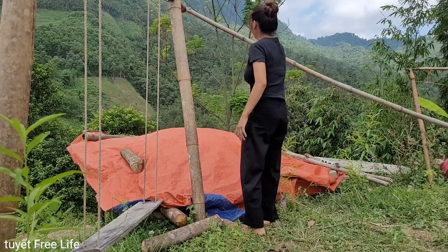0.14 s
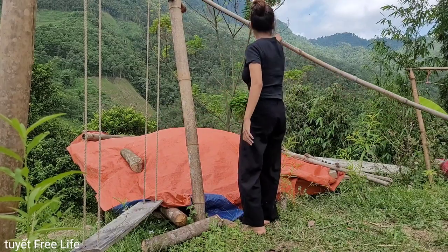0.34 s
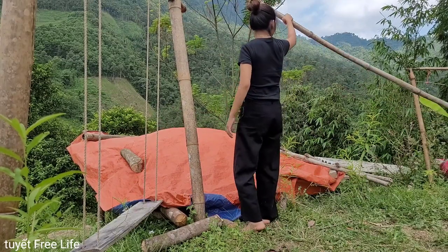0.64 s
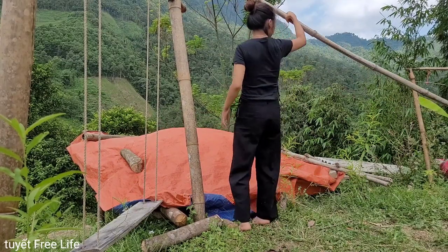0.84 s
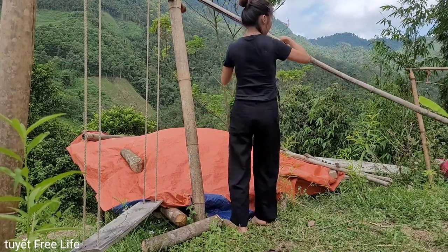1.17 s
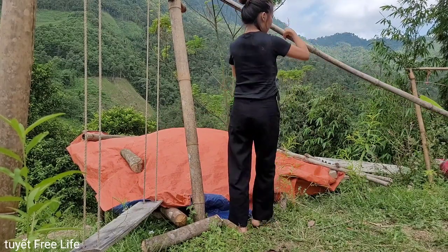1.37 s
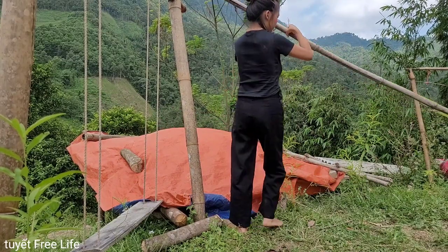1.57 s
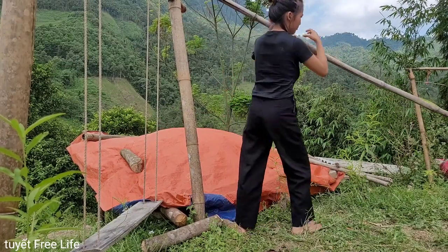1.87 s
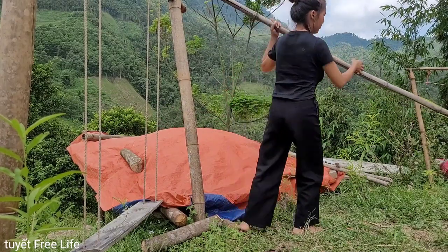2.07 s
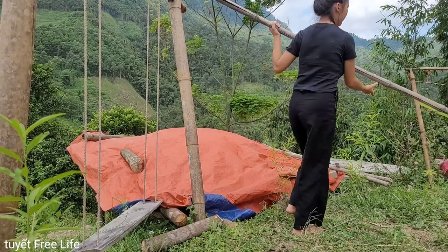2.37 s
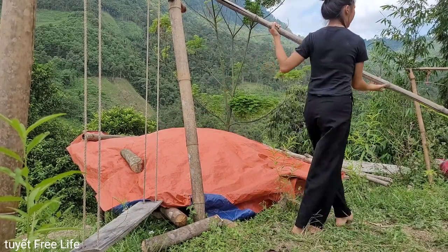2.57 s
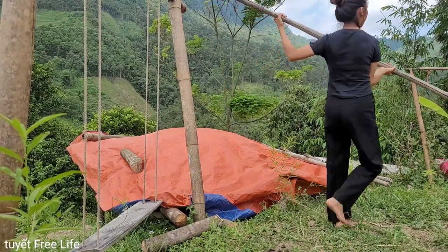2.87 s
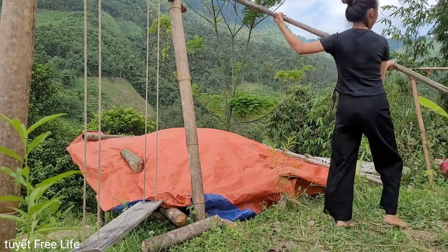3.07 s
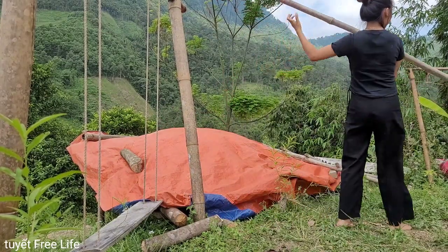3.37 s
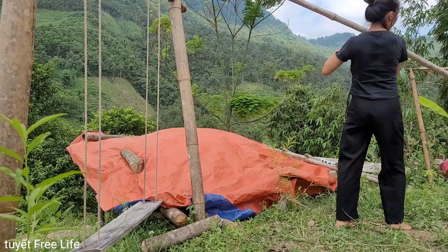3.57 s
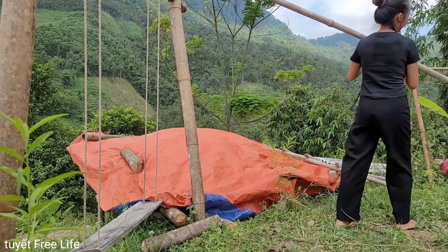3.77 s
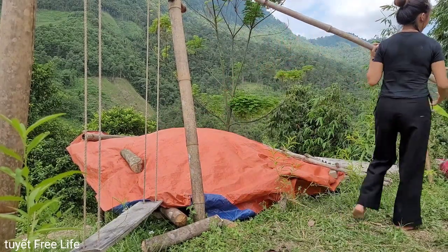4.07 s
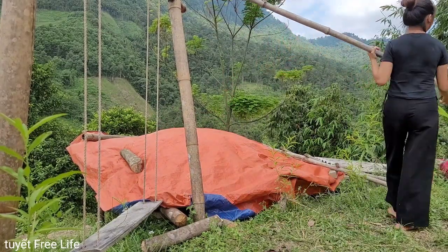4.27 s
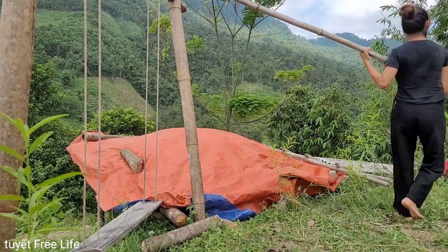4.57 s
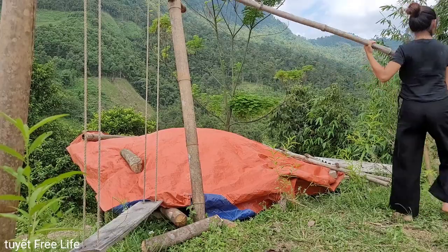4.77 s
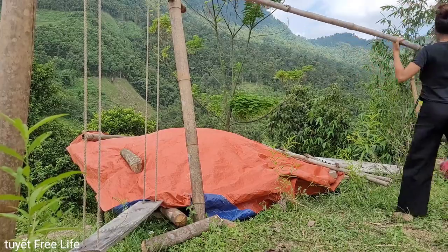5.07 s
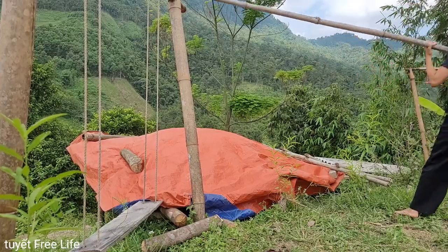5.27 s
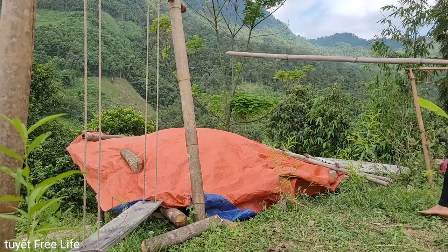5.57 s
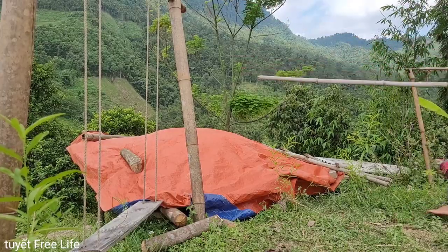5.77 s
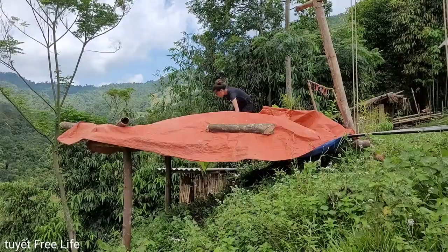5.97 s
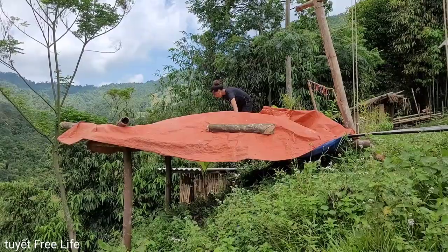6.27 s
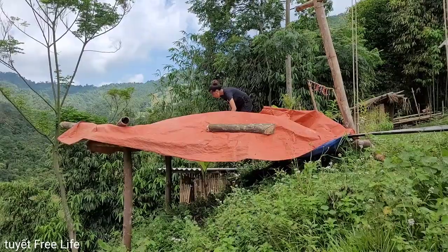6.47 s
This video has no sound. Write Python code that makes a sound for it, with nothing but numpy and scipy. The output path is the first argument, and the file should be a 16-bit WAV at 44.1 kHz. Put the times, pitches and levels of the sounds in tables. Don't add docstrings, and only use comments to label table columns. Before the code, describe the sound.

A long bamboo pole clatters and knocks on a wooden frame over a buzzing cicada, faint engine and wind thumps, before a louder insect chorus takes over.

```python
import sys
import numpy as np
from scipy import signal
from scipy.fft import rfft, irfft
from scipy.io import wavfile
from scipy.ndimage import uniform_filter1d

SR = 44100
rng = np.random.default_rng(int(sys.argv[2]) if len(sys.argv) > 2 else 0)


def to_linear_factor(level_db):
    exponent = np.asarray(level_db, float) / 20
    return 10 ** exponent


def master(y):
    cut = np.clip(np.atleast_2d(y).T, -1, 1)
    pcm = np.round(cut * 32767)
    wavfile.write(sys.argv[1], SR, pcm.astype(np.int16))


N = 292824

# [t/s, level/dB]
CHORUS_LEVEL = [(0, -47.5), (1.15, -47), (4.4, -44.5), (5.0, -38), (5.94, -46), (6.02, -38), (6.64, -36.5)]
# [f/Hz, level/dB per Hz]
FIRST_CHORUS = [(88, -44), (150, -18), (230, -5), (430, -17), (850, -15), (1300, -9), (2080, -24),
                (2520, -10), (3250, -21), (4300, -6), (7300, -3), (8800, -30), (12300, -18), (15400, -23)]
SECOND_CHORUS = [(250, -9), (500, -17), (2080, -24), (2430, -6), (3300, -27), (3850, -10), (4500, -16),
                 (5050, -11), (5450, -20), (5850, 0), (6500, -7), (7250, -2), (8800, -25), (13500, -21)]
# [f/Hz, width/Hz, level/dB]
WHISTLES = [(2540, 44, -7), (2760, 31, -9), (3810, 52, -8), (4030, 33, -8), (4250, 33, -11), (5060, 44, -6),
            (5880, 72, 0), (6300, 59, -4), (6560, 31, -2), (6790, 20, -3), (6940, 63, -3), (7190, 85, 0),
            (7420, 30, -4), (7630, 29, -8)]
# [f/Hz, level/dB]
EXHAUST = [(30, -24), (60, 3.5), (110, 1.5), (140, -1.5), (175, -21), (250, -2), (330, -10.5), (500, -49)]
# [t/s, f/Hz]
REVS = [(0, 21), (.8, 20), (2, 19.5), (3, 19), (3.7, 20), (4.05, 22), (4.45, 28), (4.8, 27), (5, 24),
        (5.3, 25.5), (5.6, 23), (6, 25)]
# [f/Hz, level/dB per Hz]
GUST_COLOUR = [(10, -49), (25, -26), (42, -8), (60, 5), (78, -1), (115, -18), (250, -36), (700, -56)]
# [peak t/s, length/s, peak level/dB, left
# minus right/dB]
GUSTS = [(0.462, 0.05, -51, -27), (1.12, 0.071, -54, 11), (1.253, 0.1, -42.5, -1), (1.59, 0.11, -58.5, 19),
         (2.48, 0.066, -48, 1), (3.349, 0.055, -44.5, -26), (3.534, 0.052, -37.5, -44),
         (3.628, 0.18, -41.5, -16), (3.885, 0.29, -48.5, -3), (3.956, 0.084, -38, -34),
         (4.068, 0.045, -24, -36), (4.142, 0.047, -36.5, -21), (4.517, 0.072, -43, 15.5),
         (4.856, 0.067, -41, 20), (5.513, 0.048, -29, 22.5), (5.653, 0.34, -49.5, 8.5),
         (5.75, 0.058, -41, 18.5), (6.003, 0.1, -49.5, -8), (6.087, 0.066, -30.5, -19),
         (6.157, 0.039, -24.5, -43), (6.263, 0.079, -26.5, -36), (6.52, 0.087, -48, 13.5)]
# [f/Hz, t60/s]
SLOPE_DECAY = [(60, 0.46), (170, 0.18), (340, 0.028), (900, 0.12), (1700, 0.092), (3000, 0.1285),
               (6000, 0.044)]
# [t/s, length/s, level/dB, centre f/Hz, width/octaves]
SCUFFS = [(1.822, 0.14, -61.5, 1376, 1.5), (2.678, 0.27, -54.5, 1110, 4.5), (2.741, 0.23, -64, 353, 1.3),
          (2.908, 0.043, -54, 2460, 1.8), (3.087, 0.065, -55, 1500, 1.6), (3.268, 0.15, -54.5, 1200, 1.84),
          (3.817, 0.019, -47, 1820, 2.9), (4.646, 0.1, -52, 1360, 2.1), (5.099, 0.76, -64, 500, 13),
          (5.853, 0.23, -57, 896, 1.8), (5.99, 0.038, -45.5, 920, 1.6), (5.5, 0.4, -67.5, 323, 1),
          (6.05, 0.34, -57, 293, 1.5), (6.377, 0.21, -59, 402, 3), (6.509, 0.022, -48.5, 280, 1.6)]
# [t/s, length/s, level/dB, f/Hz]
TAPS = [(0.27, 0.036, -57.5, 1290), (1.566, 0.036, -62, 243), (2.798, 0.03, -53, 890),
        (3.172, 0.076, -51.5, 452), (3.193, 0.05, -54, 232), (3.807, 0.06, -58, 870),
        (4.135, 0.11, -64, 216), (5.317, 0.12, -54.5, 230), (6.417, 0.036, -45.5, 258),
        (6.454, 0.047, -51, 265), (6.549, 0.033, -66, 282)]
# [t/s, length/s, level/dB]
LEAVES = [
    (1.847, 0.087, -55.5),
    (3.183, 0.033, -56.5),
    (4.853, 0.16, -51),
    (5.168, 0.083, -48.5),
    (5.473, 0.11, -51.5),
]
# [t/s, peak level/dB, centre f/Hz]
SNAPS = [
    (1.61, -44, 11000),
    (2.6575, -23, 7600),
    (2.6775, -24, 6800),
    (2.7187, -33, 4800),
    (4.01, -42, 10500),
]
# [t/s, level/dB, lift of the low drum tone/dB]
CICADA_LEVEL = [(0.0, -51.5, 6), (1.04, -48, 9.5), (1.6, -49, 7), (2.1, -49.5, 4.5), (3.22, -45.5, 5.5),
                (4.33, -43.5, 5.5), (4.75, -43, 8.5), (4.95, -38.5, 5.5), (5.55, -41.5, 4.5),
                (5.92, -48, 5.5), (6.04, -46, 0), (6.64, -66.5, 19)]
# [t/s, f/Hz]
PULSE_RATE = [(0, 257), (.4, 255.8), (1.15, 255.9), (2, 257.1), (2.9, 257.5), (4.2, 256.9), (4.8, 256.1),
              (5.6, 255), (6, 253.8), (6.64, 254.5)]
# [multiple of the rate, level/dB]
OVERTONES = [(4, -24), (5, -4.5), (6, -19.5), (7, -29.5), (8, -35), (9, -13), (10, -7), (11, -13.5),
             (12, -14.5), (13, -18.5), (14, -11.5), (15, -11), (16, -6.5), (17, -7.5), (18, -8.5),
             (19, -10.5), (20, -4.5), (21, -3), (22, -5.5), (23, -5), (24, -6), (25, -3), (26, -3.5),
             (27, -1.5), (28, 0), (29, -6.5), (30, -5.5), (31, -21.5), (32, -11.5), (33, -18)]
# [f/Hz, level/dB]
TREBLE = [(8700, -26), (9500, -21.5), (10300, -24), (11100, -15), (12300, -13.5), (13600, -15),
          (15000, -18)]
# [f/Hz, level/dB]
POLE_MODES = [
    [(393, -4.5), (452, -1.5), (515, -11), (668, -21), (812, -16.5), (1098, -32.5), (1308, -12.5),
     (1577, -12.5), (1701, -4), (1863, -8.5), (3050, -40)],
    [(361, -10), (431, -11), (500, -3), (690, -20.5), (791, -11), (1023, -8), (1300, -1), (1550, -12),
     (1750, -17), (2320, -19)],
    [(300, -9), (390, -0.5), (460, -7.5), (528, -20), (680, -18), (807, -15), (894, -35), (1120, -0.5),
     (1260, -1), (1572, -1), (1712, -9.5), (1900, -13.5)],
    [(290, -7.5), (358, -15), (434, 7.5), (689, -12), (818, -13), (1082, -12), (1308, 7), (1599, -20),
     (1707, -3.5), (1954, -45)],
    [(279, -0.5), (357, -9), (428, 5), (668, -15), (797, -11), (1281, 4), (1556, -21), (2003, -46)],
]
# [f/Hz, level/dB]
FRAME_MODES = [(110, -21.5), (170, -23.5), (250, -23.5)]
# [f/Hz, t60/s]
WOOD_DECAY = [(110, .06), (280, .06), (400, 0.097), (600, 0.0462), (1200, 0.039), (1700, 0.085),
              (3000, 0.016)]
# [t/s, peak level/dB, hardness/dB]
KNOCKS = [
    [(1.2005, -25, 2), (1.2022, -12, 4), (1.2095, -5, -18), (1.2255, -11, -13), (1.243, -12, -5),
     (1.258, -24, 3), (1.2665, -13, -9), (1.278, -18, -16), (1.297, -26, -8), (1.305, -25, -14),
     (1.319, -30, -12), (1.342, -31, -8)],
    [(2.435, -19, -4), (2.446, -22, -12), (2.459, -32, -10), (2.481, -37, -15)],
    [(4.4575, -21, 3), (4.4595, -10, 3), (4.463, -4, -5), (4.468, -8, -5), (4.4755, -11, 1),
     (4.480, -8, -14), (4.490, -16, -8), (4.499, -18, -6), (4.509, -19, -12), (4.533, -28, -8),
     (4.545, -28, -10)],
    [(4.8395, -17, -5), (4.848, -14, -14), (4.861, -3, -22), (4.8765, -13, 3), (4.883, -14, 0),
     (4.891, -15, -8), (4.902, -18, -14), (4.916, -26, -10), (4.928, -32, -2), (4.962, -33, -5)],
    [(5.0115, -23, -6), (5.017, -21, -10), (5.027, -31, -4), (5.037, -31, -10)],
]
# [f/Hz, level/dB]
CRACK_COLOUR = [(300, -13.5), (1200, 1.5), (2000, -9), (3000, -10), (4500, -17), (8000, -22),
                (11000, -41.5), (16000, -41)]
CRACK_DB = [
    3,
    -3.5,
    -1.5,
    0.5,
    2.5,
]

RAGGED_S, RAGGED_OVER_S = 4.72, 0.18
CUT_S, CUT_OVER_S = 5.96, 0.07
PORT_LAG = 6.0


def evened(x):
    return x / np.sqrt(np.mean(abs(x) ** 2) + 1e-20)


def read(points, hz):
    f, value = np.transpose(points)
    return np.interp(np.log(hz + 1), np.log(f + 1), value)


def played(rows, t):
    s, *columns = np.transpose(rows)
    return [np.interp(t, s, c) for c in columns]


def ramp(t, start, length):
    return np.clip((t - start) / length, 0, 1)


def add(mix, s, sound):
    part = mix[round(s * SR):][:len(sound)]
    part += sound[:len(part)]


def spectral_grid(size):
    return np.fft.rfftfreq(size, 1 / SR)[:, None], (np.arange(4 * N // size + 5)) * size / 4 / SR


def chance(*shape):
    return rng.standard_normal(shape) + 1j * rng.standard_normal(shape)


def to_sound(z):
    size = 2 * z.shape[-2] - 2
    return signal.istft(z, nperseg=size, noverlap=3 * size // 4)[1][..., :N]


def chorus():
    hz, t = spectral_grid(1024)
    second_share = ramp(t, CUT_S, CUT_OVER_S)
    patches = rng.standard_normal((len(hz), len(t)))
    patches = evened(uniform_filter1d(uniform_filter1d(patches, 8, 0), 14, 1))
    lines = evened(uniform_filter1d(rng.standard_normal((len(hz), len(t))), 40, 1))
    left, other = chance(2, len(hz), len(t))
    same = np.clip(1 - hz / 220.0, 0, 0.85)
    z = np.array([left, same * left + np.sqrt(1 - same ** 2) * other])
    first, second = evened(to_linear_factor(read(FIRST_CHORUS, hz))), evened(to_linear_factor(read(SECOND_CHORUS, hz)))
    colour = (1 - second_share) * first + second_share * second
    z *= colour * to_linear_factor(0.5 * patches + (4.5 + 0.13 * second_share) * lines)
    z /= np.linalg.norm(to_sound(z[0, :, :200])) / 10.7
    tilt = to_linear_factor(np.array([-2.5, 2.0])[:, None, None] * ((hz > 3500) & (hz < 8500)))
    hush_db = -7 * (1 - ramp(t, RAGGED_S, RAGGED_OVER_S))
    hush = to_linear_factor(hush_db * (hz > 3800) * (hz < 8500))
    return to_linear_factor(played(CHORUS_LEVEL, np.arange(N) / SR)[0]) * to_sound(z * tilt * hush) * 21.0


def whistles():
    hz, t = spectral_grid(2048)
    shape = sum(to_linear_factor(db) / (1 + (2 * (hz - centre_hz) / width_hz) ** 2) for centre_hz, width_hz, db in WHISTLES)
    z = chance(2, len(hz), len(t)) * shape * to_linear_factor([[[-2.5]], [[2.0]]])
    return to_linear_factor(-40.5) * evened(to_sound(z)) * ramp(np.arange(N) / SR, CUT_S, CUT_OVER_S)


def engine():
    t = np.arange(N) / SR
    rate_hz = played(REVS, t)[0]
    idle_hz, idle_db, db_per_hz = 19.3, -62.5, 1.64
    level_db = idle_db + db_per_hz * (rate_hz - idle_hz)
    turn = 2 * np.pi * np.cumsum(rate_hz) / SR
    orders = sum(to_linear_factor(read(EXHAUST, k * rate_hz)) * np.cos(k * turn + 2 * np.pi * rng.random())
                 for k in range(2, 14))
    hz, frames = spectral_grid(2048)
    wash = to_sound(chance(len(hz), len(frames)) * to_linear_factor(read(EXHAUST + [(1000, -81.5)], hz)))
    return to_linear_factor(level_db) * (0.85 * evened(orders) + 0.55 * evened(wash))


def wind():
    breeze_db, gust_fall_db = -73, 28
    hz, frames = spectral_grid(2048)
    push = to_sound(chance(2, len(hz), len(frames)) * to_linear_factor(read(GUST_COLOUR + [(1500, -102)], hz)))
    push = push / abs(uniform_filter1d(push ** 2, 1800)) ** 0.35
    t, power = np.arange(0, N, 32) / SR, to_linear_factor(2 * breeze_db) / 2
    for s, length, peak_db, pan_db in GUSTS:
        side = to_linear_factor([[pan_db], [-pan_db]])
        reach = side / (side + 1 / side) * (side / side.max()) ** 1.7
        power = power + reach * to_linear_factor(2 * (peak_db - gust_fall_db * abs(t - s) / length))
    return to_linear_factor(7.0) * evened(push) * np.repeat(np.sqrt(power), 32, axis=1)[:, :N]


def rub(mix, s, length, db, centre_hz, octaves):
    u = np.arange(16384) / SR / length
    grains = rng.standard_normal(16384) * to_linear_factor(6.5 * np.repeat(rng.standard_normal(256), 64))
    off_centre = np.log2(np.fft.rfftfreq(16384, 1 / SR) / centre_hz + 1e-9)
    band = np.exp(-0.5 * (off_centre / (0.45 * octaves)) ** 2)
    envelope = np.sin(np.pi * np.clip(u, 0, 1) ** 0.66) ** 1.1
    add(mix, s, to_linear_factor(db + 5.5) * evened(irfft(rfft(grains) * band)) * envelope)


def snap(mix, s, db, hz):
    t = np.arange(200) / SR
    tick = np.diff(rng.standard_normal(201)) * 1.34 + rng.standard_normal(200) * 0.18
    tick = tick + 0.91 * np.sin(2 * np.pi * hz * t)
    add(mix, s, to_linear_factor(db) * tick * (1 - np.exp(-t / 0.0003)) * np.exp(-t / 0.0007) * 2)


def foot_and_hand_sounds():
    mix = np.zeros(N)
    for row in SCUFFS:
        rub(mix, *row)
    for row in TAPS:
        rub(mix, *row, octaves=0.6)
    for row in LEAVES:
        rub(mix, *row, centre_hz=11100, octaves=1)
    for row in SNAPS:
        snap(mix, *row)
    return mix


def ports(x, lag):
    hz = np.fft.rfftfreq(N, 1 / SR)
    return np.array([irfft(rfft(x) * np.exp(-2j * np.pi * hz * lag / SR), N), x])


def hillside(x):
    hz, t = spectral_grid(256)
    left, other = chance(2, len(hz), 350)
    same = np.clip(3 - hz / 250.0, 0.3, 0.99)
    z = np.array([left, same * left + np.sqrt(1 - same ** 2) * other])
    tail = to_sound(z * to_linear_factor(-60 * t[:350] / read(SLOPE_DECAY, hz)))[:, 128:]
    return signal.fftconvolve(x[None], tail / np.linalg.norm(tail[0]), axes=1)[:, :N]


def cicada_pulses(rate_hz):
    turn = 2 * np.pi * np.cumsum(rate_hz) / SR
    upper_db = read(TREBLE, np.arange(34, 62) * np.mean(rate_hz))
    heights = to_linear_factor([db for _, db in OVERTONES] + list(upper_db))
    phases = rng.uniform(0, 2 * np.pi, 58)
    return sum(a * np.cos(k * turn + p) for k, a, p in zip(range(4, 62), heights, phases))


def drift(frames, smoothing):
    return evened(uniform_filter1d(uniform_filter1d(chance(2, 90, frames), smoothing), smoothing))


def cicada():
    t = np.arange(N) / SR
    rate_hz, level_db = played(PULSE_RATE, t)[0], played(CICADA_LEVEL, t)[0]
    pulses = cicada_pulses(rate_hz)
    hz, t, z = signal.stft(pulses, SR, nperseg=1024, noverlap=768)
    overtone = np.round(hz / np.mean(rate_hz)).astype(int)
    ragged = ramp(t, RAGGED_S, RAGGED_OVER_S)
    fuzzy, merged = (uniform_filter1d(abs(z) ** 2, bins, 0) for bins in (3, 6))
    smear = np.sqrt(abs(fuzzy + (merged - fuzzy) * ragged)) * chance(2, len(hz), len(t))
    number = np.arange(90)[:, None]
    scatter = np.clip(number / 12.0, 0, 1) ** 1.5
    unsteady = 0.13 + (0.98 - 0.13) * ragged
    unsteady = np.clip(unsteady * (0.45 + 0.5 * scatter + 4.6 * (number > 33)), 0, 0.98)
    slow, shimmer = drift(len(t), 50), drift(len(t), 8)
    common, differing = np.array([[[1.0]], [[0.0]]]) + scatter * (0.55 * slow + 0.5 * shimmer)
    port_phase = 2.33 + 0.899 * scatter * rng.standard_normal((90, 1))
    differing = differing + (0.63 + 0.19 * scatter) * np.exp(1j * port_phase)
    paths = np.array([common + differing, common - differing])
    z = z * (np.sqrt(1 - unsteady ** 2) * paths)[:, overtone]
    z = z + 1.4 * unsteady[overtone] * smear * to_linear_factor([[[-2]], [[2]]])
    throb_turn = 2 * np.pi * 16.6 * t + 3 * np.sin(hz[:, None] / 2500 + 3 * t)
    throb = 1 + 0.27 * scatter[overtone] * np.sin(throb_turn)
    drum_db = played(CICADA_LEVEL, t)[1]
    voice = to_sound(z * throb * to_linear_factor(drum_db * (hz[:, None] < 1800)))
    return to_linear_factor(level_db) * voice / np.sqrt(np.mean(pulses ** 2))


def knock(mix, blows, modes, crack_db):
    choke_db, choke_s = -13, 0.0014
    swell_cycles = 0.8
    t = np.arange(4096) / SR
    colour = evened(to_linear_factor(read([(100, -47.0)] + CRACK_COLOUR, np.fft.rfftfreq(4096, 1 / SR))))
    next_times = [b[0] for b in blows[1:]] + [N]
    for (s, peak_db, hard_db), next_s in zip(blows, next_times):
        scrape = irfft(rfft(rng.standard_normal(4096)) * colour) * to_linear_factor(-60 * t / 0.026)
        ring = to_linear_factor(crack_db + hard_db) * scrape
        for k, (hz, db) in enumerate(modes + FRAME_MODES):
            mode_db = 0.76 * db + (hard_db - 4.0) * (hz > 950) + 1.3 * rng.standard_normal()
            build = 1 - np.exp(-t * hz / swell_cycles)
            decay = to_linear_factor(-60 * t / read(WOOD_DECAY, hz))
            ring += (-1) ** k * to_linear_factor(mode_db) * build * decay * np.sin(2 * np.pi * hz * t)
        swell = 1 - np.exp(-t / 0.002)
        choke = choke_db * ramp(t, next_s - s - choke_s, choke_s)
        add(mix, s, to_linear_factor(peak_db + 3.5 + choke) * ring * swell)


def scene():
    pole = np.zeros(N)
    for blows, modes, crack_db in zip(KNOCKS, POLE_MODES, CRACK_DB):
        knock(pole, blows, modes, crack_db)
    small = foot_and_hand_sounds()
    near = ports(pole, PORT_LAG - 2) + ports(small, PORT_LAG + 1)
    near = near + hillside(to_linear_factor(-6.5) * pole + to_linear_factor(-5) * small)
    return chorus() + whistles() + engine() + wind() + cicada() + near


def ducking(dry):
    depth_db, trigger_db, fall_s, recover_db_per_s = 5.5, -20, 0.2, 6
    power_db = 10 * np.log10(abs(uniform_filter1d((dry ** 2).mean(0), 400)) + 1e-12)
    back = np.arange(N) * recover_db_per_s / SR
    asked_db = depth_db * np.clip((power_db - trigger_db) / 10, 0, 1)
    held_db = np.maximum.accumulate(asked_db + back) - back
    r = np.exp(-1 / (fall_s * SR))
    return to_linear_factor(-signal.lfilter([1 - r], [1, -r], held_db))


def roll_off(x):
    return signal.sosfilt(signal.butter(12, 16670, fs=SR, output="sos"), x)


def record(dry):
    edge = signal.firwin(401, 15450, window=("kaiser", 8), fs=SR)
    clipped = np.clip(dry * ducking(dry), -1, 1)
    limited = signal.oaconvolve(clipped, edge[None], "same")
    return roll_off(limited)


dry = scene()
out = record(dry)
master(out)
```